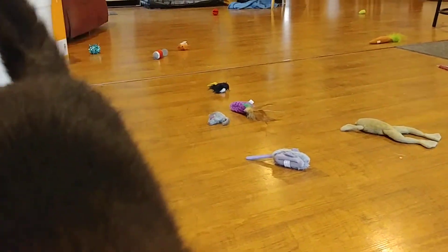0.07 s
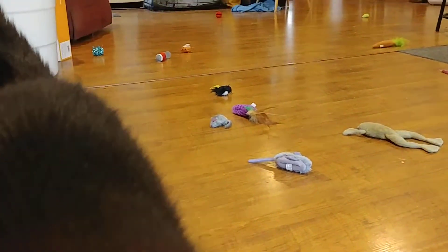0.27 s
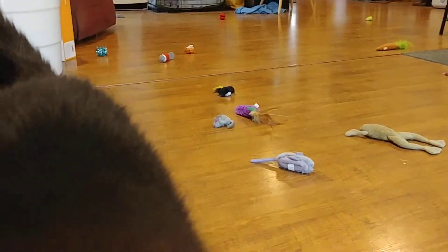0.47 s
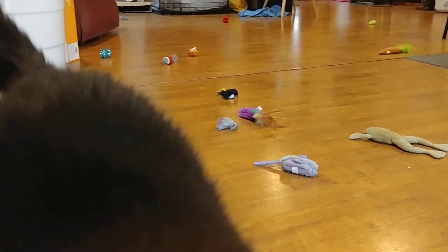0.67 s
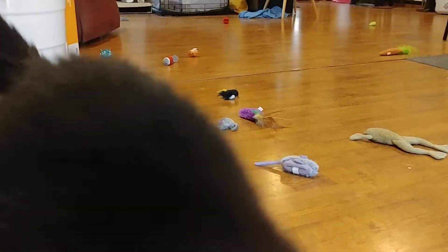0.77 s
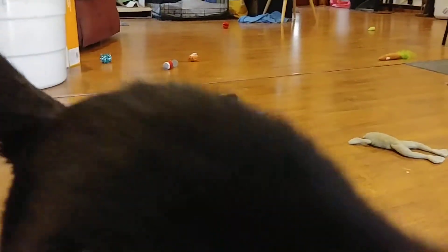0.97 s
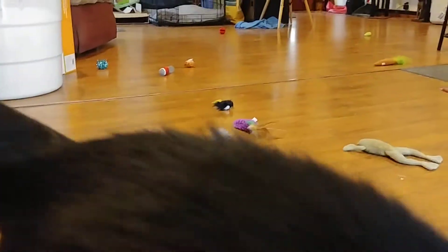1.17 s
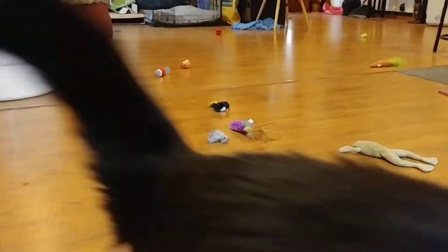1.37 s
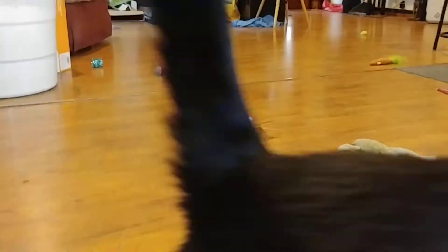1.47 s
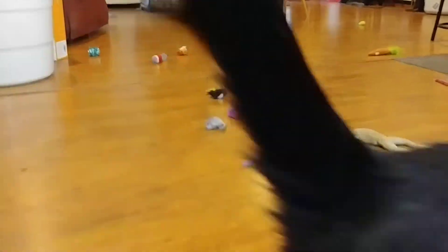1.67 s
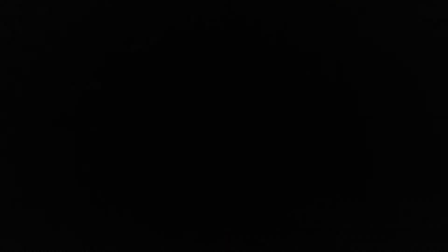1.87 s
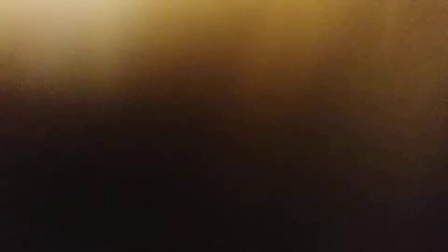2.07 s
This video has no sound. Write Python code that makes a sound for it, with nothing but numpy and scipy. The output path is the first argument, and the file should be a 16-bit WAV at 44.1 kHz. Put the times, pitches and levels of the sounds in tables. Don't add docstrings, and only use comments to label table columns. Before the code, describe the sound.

Cat fur rubs a phone microphone in a quiet home. Light, airy, bright strokes come and go, mostly on the left, over faint hiss and low machinery hum. At 0.43 seconds a soft knock bounces quickly on the right; tiny scratches tick near 0.2 and 0.86. At about 1.73 the body bumps in with a loud clipped thump, then rough scraping and low thuds, easing around 2.0 before rising again.

```python
import sys
import numpy as np
from scipy import signal
from scipy.fft import rfft, irfft
from scipy.io import wavfile
from scipy.ndimage import uniform_filter1d

SR = 44100
rng = np.random.default_rng(int(sys.argv[2]) if len(sys.argv) > 2 else 0)


def nominal_scale(level):
    x = np.asarray(level, float) / 20
    return 10 ** x


def to_wav(sig):
    pcm = np.clip(np.atleast_2d(sig), -1, 1) * 32767
    pcm = np.round(pcm).astype(np.int16)
    wavfile.write(sys.argv[1], SR, pcm.T)


N = 92786
TIME = np.arange(N) / SR


def evened(x):
    return x / np.sqrt(np.mean(x ** 2) + 1e-20)


def read_spectrum(points, hz):
    table_hz, value = np.transpose(points)
    return np.interp(np.log(hz + 1), np.log(table_hz + 1), value)


def follow(curve, column=1):
    points = np.array(curve)
    return np.interp(TIME, points[:, 0], points[:, column])


def colour(x, points):
    gain = nominal_scale(read_spectrum(points, np.fft.rfftfreq(N, 1 / SR)))
    return evened(irfft(rfft(x) * gain, N))


def resonate(x, hz, width_hz):
    turn = np.exp(2j * np.pi * np.cumsum(hz * np.ones(N)) / SR)
    r = np.exp(-np.pi * width_hz / SR)
    smooth = signal.lfilter([1], [1, -2 * r, r * r], x / turn)
    return evened((turn * smooth).real)


def dying(s, rise_s, t60):
    t = np.maximum(TIME - s, 0)
    return np.minimum(t / rise_s, 1) * nominal_scale(-60 * t / t60)


HAIRS_PER_S, HAIR_SPREAD_DB, HAIR_SHARE = 2500, 5, .4
CLUMP_DB = 1.2


def fur(tone):
    hiss, sign, slow = rng.standard_normal((3, N))
    strength = nominal_scale(HAIR_SPREAD_DB * np.minimum(rng.exponential(1, N), 2))
    snaps = np.sign(sign) * strength * (rng.random(N) < HAIRS_PER_S / SR)
    slow = uniform_filter1d(uniform_filter1d(slow, size=200), size=200)
    clumps = nominal_scale(CLUMP_DB * evened(slow))
    return evened(clumps * colour(hiss + HAIR_SHARE * evened(snaps), tone))


# (time [s], pressure level [dB])
RUB_LEFT = [(1.732, -67), (1.738, -31.5), (1.78, -37), (1.803, -26), (1.835, -38), (1.93, -45.5),
            (2.03, -52), (2.06, -44), (2.095, -31.5)]
RUB_RIGHT = [(1.736, -52), (1.756, -45), (1.79, -38), (1.83, -33), (1.87, -29), (1.95, -35.5),
             (2.01, -38.5), (2.04, -50.5), (2.105, -35.5)]
# (frequency [Hz], density [dB per Hz])
RUB_LEFT_TONE = [(180, -27), (300, -2), (870, -6.5), (1750, -13), (4830, -8.5), (6000, -17), (7950, -18),
                 (10200, -43), (16000, -50)]
RUB_RIGHT_TONE = [(100, 2.5), (500, -7.5), (870, -5), (2900, -11.5), (6000, -22.5), (8800, -30),
                  (10000, -55), (16000, -50)]


def rubbing():
    touch = TIME > RUB_LEFT[0][0]
    left = nominal_scale(follow(RUB_LEFT)) * fur(RUB_LEFT_TONE)
    right = nominal_scale(follow(RUB_RIGHT)) * fur(RUB_RIGHT_TONE)
    return touch * np.array([left, right])


def push(s, rise_ms):
    u = np.maximum((TIME - s) * 1000 / rise_ms + 0.34, 0) / 1.304
    return u ** 3 * np.exp(3 * (1 - u))


# (time [s], level [dB], direction [+1 in, -1 out], rise [ms])
PUSH_LEFT = [
    (1.738, -17, 1, 1.63),
    (1.7412, -3.5, -1, 1.01),
    (1.746, 7, -1, 1.164),
]
PUSH_RIGHT = [(0.3197, -32.5, 1, 1.36), (.597, -31.5, -1, 1.42), (0.95, -31.5, -1, 2.5),
              (1.368, -31.5, 1, 2.3), (1.528, -27.5, 1, 6.0), (1.746, 2.5, 1, 0.68),
              (1.7478, 2.5, -1, 0.36), (1.7524, -11, 1, 3.2), (1.8085, -17, 1, 2.6), (1.8203, -9, 1, 2.5),
              (1.838, 2.5, 1, 2.68), (1.8488, -3.5, 1, 2.93), (1.872, -6.5, 1, 5.3), (2.0124, -13, -1, 3.3),
              (2.036, -18.5, -1, 1.19)]
PUSH_LEAK_DB = -21


def pushes():
    ports = np.array([sum(np.sign(way) * nominal_scale(db) * push(s, ms) for s, db, way, ms in rows)
                      for rows in (PUSH_LEFT, PUSH_RIGHT)])
    return ports + nominal_scale(PUSH_LEAK_DB) * ports[::-1]


def snap(s, ms):
    u = (TIME - s) * 1000 / ms
    tip = u / .42
    hard_tip = nominal_scale(-27) * 2 * tip / (1 + tip ** 2) ** 2
    return -np.cos(u + 1.11) / (1 + u ** 2) + hard_tip


def ring(s, modes):
    t = np.maximum(TIME - s, 0)
    soft_start = (1 - np.exp(-t / 0.00084)) ** 2
    return soft_start * sum(nominal_scale(db - 60 * t / t60) * np.sin(2 * np.pi * hz * t) for hz, db, t60 in modes)


# (time [s], snap level [dB], snap width [ms], rebound level [dB])
BOUNCES = [
    (0.4337, -8, 0.37, -11),
    (0.4507, -15.5, .42, -16),
    (0.4688, -17, 0.45, -16.5),
    (0.5028, -22.5, 0.67, -21),
    (1.7488, -2.5, 0.28, -50),
]
# (frequency [Hz], level [dB], t60 [s])
CASE = [(111, -35.5, 0.18), (155.6, -9.5, 0.075), (312.7, -18, 0.1), (676, -1.5, 0.0048)]
REBOUND_MS, REBOUND_LAG_MS = 1.5, 1.72
PUFF_DB, PUFF_T60_S, PUFF_HZ = -48, 0.17, 2230


def knock():
    low_pass = signal.butter(2, PUFF_HZ, fs=SR)
    grit = evened(signal.lfilter(*low_pass, rng.standard_normal((2, N))))
    right, puffs = 0, 0
    for s, snap_db, ms, back_db in BOUNCES:
        rebound = push(s + REBOUND_LAG_MS / 1000, REBOUND_MS) + ring(s, CASE)
        right = right + nominal_scale(back_db) * rebound + nominal_scale(snap_db) * snap(s, ms)
        puffs = puffs + nominal_scale(snap_db + PUFF_DB) * dying(s, 0.0009, PUFF_T60_S)
    return right * nominal_scale([[-27], [0]]) + puffs * grit * nominal_scale([[-6], [0]])


def swells(rows):
    return sum(nominal_scale(db) * np.cos(np.pi * np.clip((TIME - s) / length, -.5, .5)) ** 2
               for s, length, db in rows)


# (middle [s], length [s], level [dB])
STROKES = [(.1, 0.26, -64.5), (.325, 0.13, -65), (.46, 0.22, -71.5), (.61, 0.15, -54.5), (.81, 0.1, -64.5),
           (.87, 0.27, -68.5), (1.0, 0.13, -54), (1.15, 0.28, -62), (1.26, 0.15, -53), (1.345, .06, -67.5),
           (1.69, 0.17, -58.5)]
# (frequency [Hz], density [dB per Hz])
STROKE = [(880, -47), (1500, -37.5), (1760, -77), (1900, -11.5), (6760, -6.5), (7840, 7), (10300, -19.5),
          (14300, -13.5), (16000, -4.5)]
# (middle [s], length [s], level [dB])
SQUEAKS = [
    (.0, 0.1, -64.5),
    (1.26, 0.22, -72.5),
    (1.35, 0.079, -66.5),
]
SQUEAK_HZ, SQUEAK_WIDTH_HZ = 5450, 760
STROKE_LEAK_DB, STROKE_LEAK_HZ = -4, 6000
SLAP_S, SLAP_DB, SLAP_RISE_S, SLAP_T60_S = 1.734, -33.5, 0.0048, 0.45


def brushing():
    dull = signal.lfilter(*signal.butter(1, STROKE_LEAK_HZ, fs=SR), fur(STROKE))
    squeak = [resonate(x, SQUEAK_HZ, SQUEAK_WIDTH_HZ) for x in rng.standard_normal((2, N))]
    slap = nominal_scale(SLAP_DB) * dying(SLAP_S, SLAP_RISE_S, SLAP_T60_S) * fur(STROKE) * nominal_scale([[0], [-30]])
    strokes = swells(STROKES) * np.array([fur(STROKE), nominal_scale(STROKE_LEAK_DB) * dull])
    squeaks = swells(SQUEAKS) * squeak * nominal_scale([[0], [-4]])
    return slap + strokes + squeaks


# (time [s], level [dB])
TICKS = [
    (.203, -59.5),
    (.857, -52.5),
    (.885, -64),
]
# (frequency [Hz], width [Hz], level [dB])
TICK = [(980, 990, -2.5), (1740, 900, -6), (2390, 860, -9), (4200, 800, -17)]
TICK_T60_S = 0.075


def ticks():
    grain = [sum(nominal_scale(db) * resonate(x, hz, width_hz) for hz, width_hz, db in TICK)
             for x in rng.standard_normal((2, N))]
    return sum(nominal_scale(db) * dying(s, 0.00072, TICK_T60_S) for s, db in TICKS) * grain


DRONE_WIDTH_HZ, WAVER_DB = 7.0, -8


def hum(tone):
    phase = np.cumsum(follow(tone)) / SR + rng.random()
    clean = np.sqrt(2) * np.sin(2 * np.pi * phase)
    waver = resonate(rng.standard_normal(N), follow(tone), DRONE_WIDTH_HZ)
    return nominal_scale(follow(tone, column=2)) * (clean + nominal_scale(WAVER_DB) * waver)


# (time [s], frequency [Hz], level [dB])
MAINS = [(0, 59, -60), (2.1, 58.87, -57.5)]
# (time [s], frequency [Hz], level [dB])
DRONE_LOW = [(0, 74.8, -62), (0.499, 79.43, -66), (.75, 82.6, -68.5), (1.2, 81.72, -62.5),
             (1.399, 88.6, -55), (1.6, 89.1, -53), (1.75, 88.7, -54.5), (1.9, 88.5, -46),
             (2.1, 90.96, -47.5)]
DRONE_HIGH = [(0, 122, -60), (.4, 123.5, -57), (.7, 127, -65), (1.0, 126.5, -56), (1.25, 128, -64),
              (1.33, 146, -64), (1.45, 145, -58), (1.7, 140, -58), (2.1, 146, -53)]


def drone():
    return sum(hum(tone) for tone in (MAINS, DRONE_LOW, DRONE_HIGH))


# (frequency [Hz], density [dB per Hz])
ROOM = [(35, -18), (60, 3), (127, -8), (308, -16), (822, -24), (924, -28), (3040, -33), (10000, -46.5),
        (16000, -41)]
# (frequency [Hz], left-right likeness [0 to 1])
SAME = [(60, 0.21), (240, 0.72), (950, 0.05), (3770, 0.03), (15000, 0.05)]
ROOM_DB, ROOM_LEFT_DB, PATCH_DB = -58, 3, 1.43


def room():
    frames, hz = N // 256 + 5, np.fft.rfftfreq(1024, 1 / SR)
    a, b, c, d, patches = rng.standard_normal((frames, 513, 5)).T
    patches = uniform_filter1d(patches, size=14, axis=0)
    patches = evened(uniform_filter1d(patches, size=12, axis=1))
    same = np.clip(read_spectrum(SAME, hz), -1, 1)[:, None]
    left = a + 1j * b
    right = same * left + np.sqrt(1 - same ** 2) * (c + 1j * d)
    z = np.array([left, right]) * nominal_scale(read_spectrum(ROOM, hz)[:, None] + PATCH_DB * patches)
    air = nominal_scale(ROOM_DB) * evened(signal.istft(z, nperseg=1024, noverlap=768)[1][:, :N])
    return (air + drone()) * nominal_scale([[ROOM_LEFT_DB / 2], [-ROOM_LEFT_DB / 2]])


def scene():
    return rubbing() + pushes() + knock() + brushing() + ticks() + room()


def top_cut(x):
    return signal.sosfilt(signal.butter(12, 16670, fs=SR, output="sos"), x)


LOW_CUT_HZ, EDGE_HZ = 62, 15800
UNDERCUT_DB = -22


def record(dry):
    low_cut = signal.butter(10, LOW_CUT_HZ, "high", fs=SR, output="sos")
    cut = signal.sosfilt(low_cut, dry)
    clipped = np.clip(cut + nominal_scale(UNDERCUT_DB) * dry, -1, 1)
    edge = signal.firwin(511, EDGE_HZ, window=("kaiser", 9), fs=SR)
    mix = signal.oaconvolve(clipped, edge[None], "same")
    return top_cut(mix)


dry = scene()
out = record(dry)
to_wav(out)
```